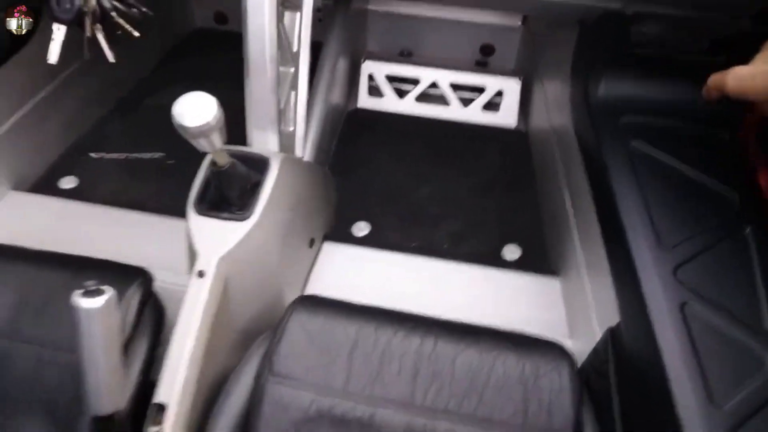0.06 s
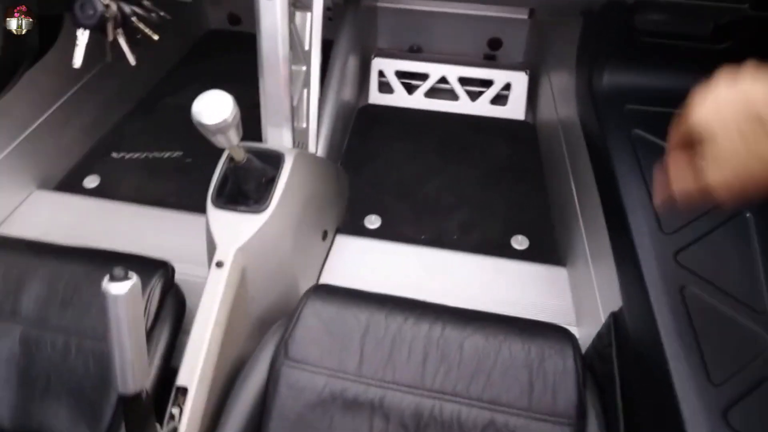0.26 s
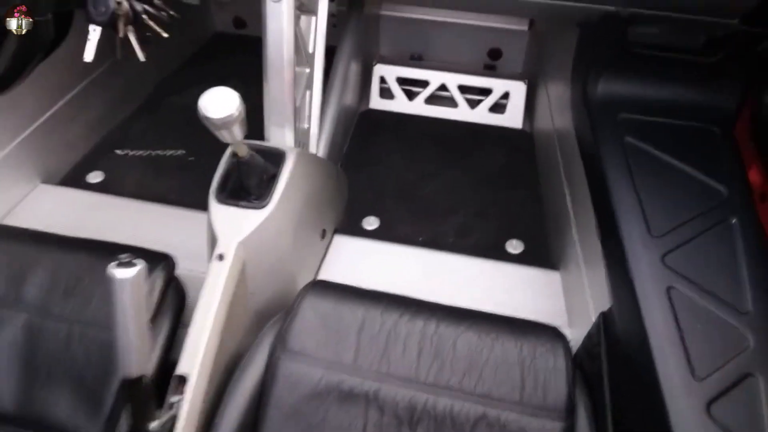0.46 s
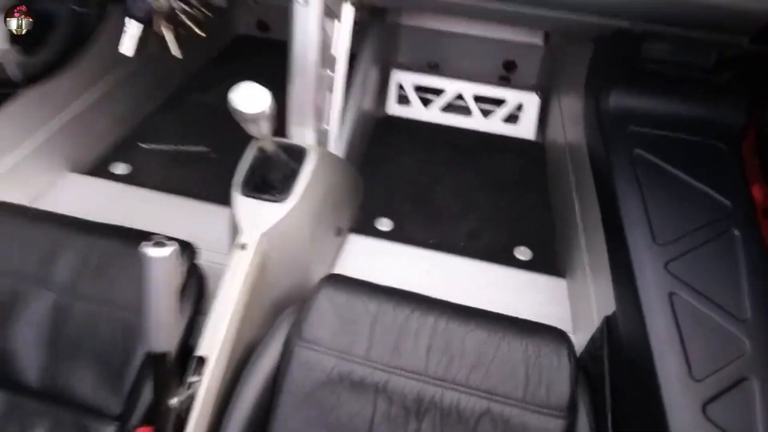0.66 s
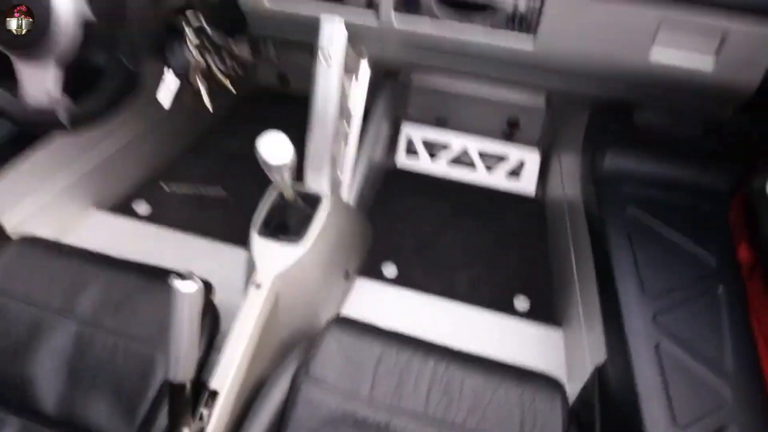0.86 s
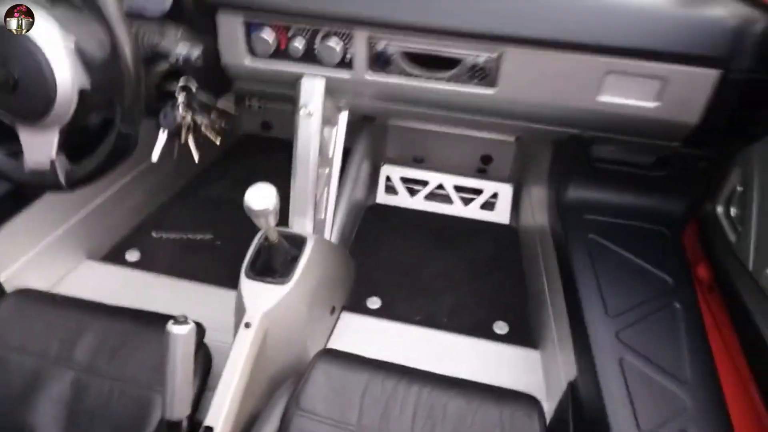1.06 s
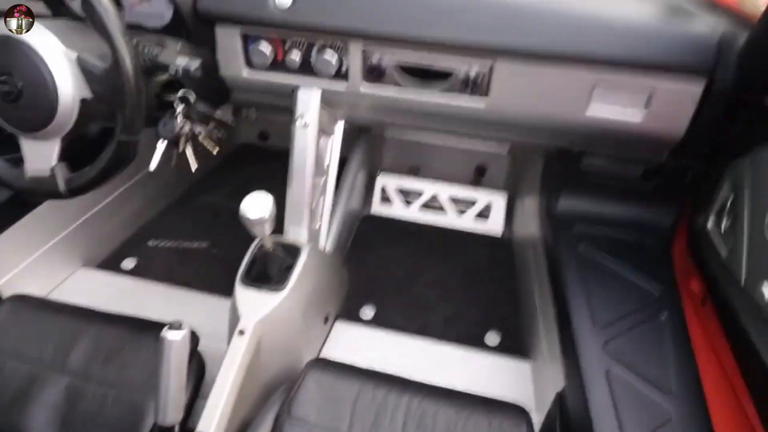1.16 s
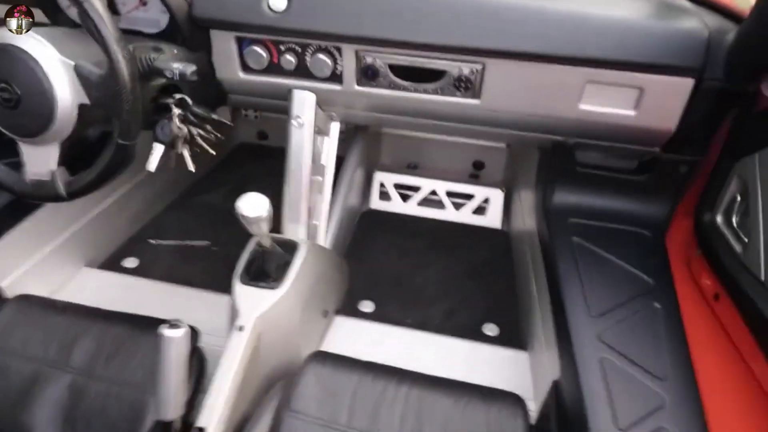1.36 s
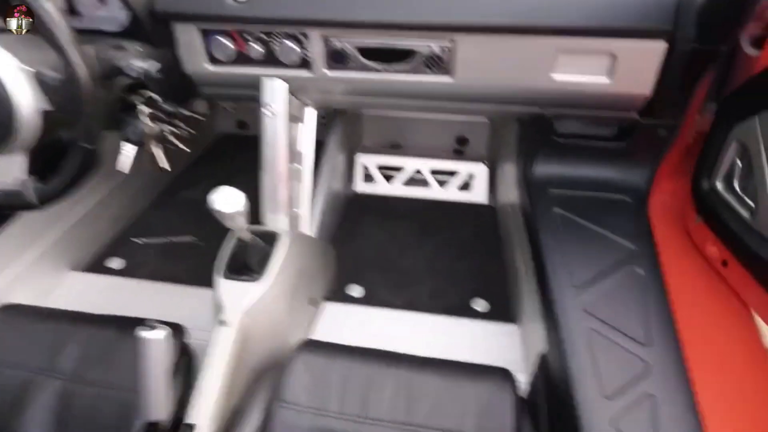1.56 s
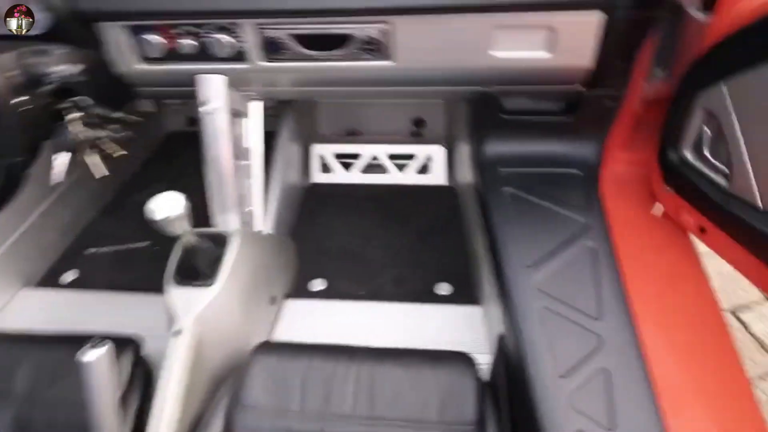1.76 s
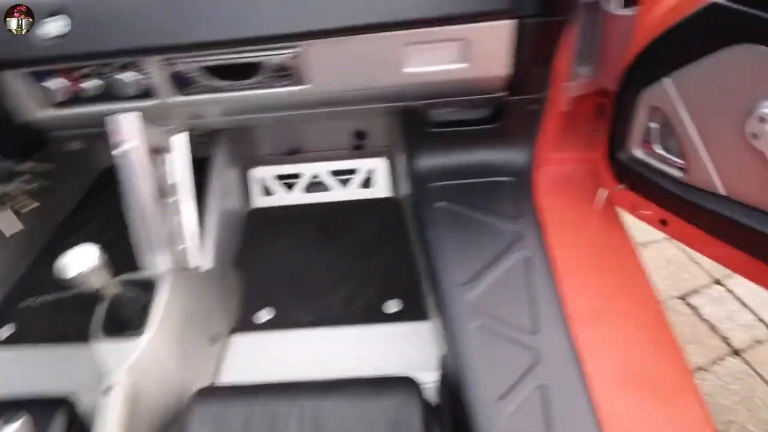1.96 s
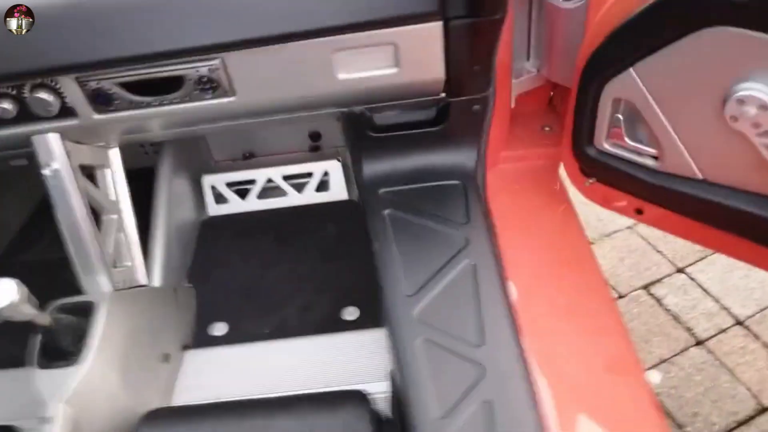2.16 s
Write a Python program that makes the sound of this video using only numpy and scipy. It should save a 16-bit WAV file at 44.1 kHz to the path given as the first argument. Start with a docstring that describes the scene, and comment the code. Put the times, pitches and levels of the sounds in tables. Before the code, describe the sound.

A car door mechanism clicks and clunks loudly, then creaks in a dry stuttering rasp, ending in dull bumps.

```python
"""Car door mechanism with a stick-slip creak

Inside a small car, a hand works the door mechanism: it clicks, lets go with a loud clunk and knocks again
as the door moves. Knocks are noise bursts and impulses that ring modes of panel, cabin air and steel.
A dry part creaks in stick-slip, stutters and stops: trains of impulses drive short noise and damped modes.
Sliding hisses, before and after the creak, are swells of noise with a gliding resonance; dull bumps follow.
Behind them lie a low rumble and a faint outdoor hiss of filtered noise."""
import sys
import numpy as np
from scipy import signal
from scipy.fft import rfft, irfft
from scipy.io import wavfile
from scipy.ndimage import uniform_filter1d

SR = 44100
rng = np.random.default_rng(int(sys.argv[2]) if len(sys.argv) > 2 else 0)


def int16_out(signal):
    """Quantize to a 16-bit WAV file."""
    q = np.round(np.clip(np.atleast_2d(signal).T, -1, 1) * 32767)
    wavfile.write(sys.argv[1], SR, q.astype(np.int16))


N = 97020

# Background spectrum: frequency_hz, relative_density_db
AIR_SPECTRUM = [(25, -2), (55, 1), (170, -10), (300, -16.5), (1000, -19), (3200, -19), (5500, -26.5),
                (8000, -32), (10200, -31.5), (16000, -42)]
# Outdoor hiss over time: time_s, level_db
HISS_LEVEL = [(0, -67), (.15, -60.5), (.4, -55.5), (.6, -52.5), (0.68, -54.5), (1.02, -55), (1.5, -56),
              (1.78, -56.5), (2.2, -80)]
RUMBLE_DB, AIR_SPLIT_HZ, HISS_FLICKER_DB = -46, 525, 1

# Sliding strokes, with Gaussian rise and fall widths: peak_s, rise_s, fall_s, level_db,
# resonance_hz, glide_octaves_per_s, resonance_re_hiss_db, resonance_half_width_hz
SLIDE_STROKES = [(0.762, 0.013, 0.01, -40.5, 2550, -0.16, 4.5, 446),
                 (.91, 0.03, 0.035, -50, 4740, .3, 1.5, 810),
                 (0.916, 0.04, 0.031, -64, 13600, -.1, 10, 2640),
                 (1.874, 0.027, 0.028, -53.5, 4860, -1.6, -2, 170),
                 (1.935, 0.065, 0.14, -55, 4220, -0.85, 4.5, 161),
                 (2.1, 0.084, 0.15, -54.5, 6310, -0.54, -4.5, 670),
                 (2.136, 0.018, 0.017, -47, 1876, 0.096, 5, 292)]
# Spectrum of the sliding hiss: frequency_hz, relative_density_db
SLIDE_SPECTRUM = [(300, -45), (1000, 0), (2500, 0), (4500, -6), (6800, -16), (8200, -19.5), (10500, -19.5),
                  (16000, -35)]
SLIDE_GRAIN_DB, SLIDE_PAN_DB = 0.8, 2.5  # pan: left minus right
SLIDE_WOBBLE = 0.006  # rms share of the resonance frequency

# Runs of stick-slip, a rasp that breaks into stutters: start_s, length_s, slip_rate_hz, level_db
SLIP_RUNS = [(1.049, .021, 120, -4), (1.0727, .009, 204, 0), (1.0852, .013, 209, 1.5),
             (1.1046, .038, 127, 1.5), (1.1456, .081, 193, -1), (1.2299, .036, 146, -1),
             (1.2743, .029, 115, 2), (1.3082, .028, 203, 1.5), (1.3432, .039, 121.5, 0.5),
             (1.393, .021, 66, 3), (1.417, .032, 139.6, 2.5), (1.4513, .015, 220, -9),
             (1.5091, .011, 128, 2.5), (1.5627, .019, 76, 4), (1.588, .022, 104, -3.5),
             (1.6174, .004, 101, -0.5), (1.627, .028, 151, 1)]
# Spectrum of one slip: frequency_hz, relative_density_db
SLIP_SPECTRUM = [(400, -9.5), (680, -9), (760, 3), (930, -1), (1150, -3.5), (1900, -3), (2600, -8.5),
                 (5200, -12.5), (6500, -18), (8000, -29), (10300, -28.5), (15000, -36)]
# Resonances of the creaking part: frequency_hz, relative_level_db, t60_s
CREAK_MODES = [(131.8, 3.5, 0.35), (178.6, -6, 0.49), (246.3, 2.5, 0.16), (309, 3.5, 0.098),
               (372, -0.5, 0.16), (442, 0, 0.21), (594.6, 0, 0.18), (747, 4.5, 0.085), (936, 8, 0.041)]
# Drive of those low resonances over time: time_s, relative_level_db
CREAK_BODY_LEVEL = [(1.05, -1), (1.2, -2), (1.35, -1.5), (1.4, -9), (1.66, -3.5)]
RASP_DB, GRUMBLE_DB, CREAK_RING_DB, CREAK_STEEL_DB = -47.5, -53.5, -43, -53
RASP_PAN_DB = 1  # left minus right
SLIP_DECAY_S, SCATTER_DECAY_S, SCATTER_DB = 0.0016, 0.009, -12  # time constants; scatter re snap
SLIP_JITTER_S, SLIP_STRENGTH_SPREAD_DB = 0.0003, 1.2  # standard deviations
SLIP_FRESH = 0.3  # power share of a slip's noise that never repeats
CONTACT_HOLD_S, CONTACT_PATCHES = 0.08, 14  # spacing of the contact patches and their number
CREAK_DRIFT = 0.025  # rms rate of delay change before the slow part is removed (samples per sample)

# Knocks of the mechanism: start_s, boom_db, panel_db, clack_db, tick_db, clack_and_tick_time_constant_s
KNOCKS = [(0.064, -36, -30.5, -36, -33.5, 0.023), (.097, -24.5, -31.5, -32, -78, 0.019),
          (0.111, -34, -31.5, -59, -72, 0.0065), (0.16, -38, -37.5, -46.5, -85, 0.09),
          (0.2076, -52, -15.5, -11.5, -24.5, 0.0073), (0.2158, -17, -12, -9.5, -21, 0.011),
          (0.2227, -32, -17, -17.5, -31, 0.011), (0.2332, -16, -24.5, -21.5, -34, 0.018),
          (0.319, -30, -41, -63, -72, 0.028), (0.437, -39, -53, -42.5, -74, 0.017),
          (0.602, -52, -59, -43, -44.5, 0.009), (.724, -33.5, -72, -55, -51, 0.032),
          (0.7431, -32.5, -38, -24, -26, 0.0044), (0.7575, -34, -42, -24.5, -50, 0.0065),
          (0.775, -31.5, -73, -44, -79, 0.074), (0.807, -56, -36, -48, -79, 0.019),
          (0.846, -36, -49, -40, -66, 0.018), (0.977, -60, -54, -81, -53.5, 0.018),
          (1.469, -38, -66.5, -71.5, -73, 0.014), (1.676, -33.5, -59, -59, -79, 0.029),
          (1.761, -46, -47, -68, -50.5, 0.0045), (1.811, -38, -61, -45, -61, 0.018),
          (1.8346, -36.5, -37.5, -43, -59, 0.14), (1.896, -24, -27.5, -36, -76, 0.01),
          (1.921, -25.5, -35.5, -44.5, -75, 0.021), (1.973, -31, -57, -52.5, -80, 0.074),
          (2.093, -35, -38.5, -47.5, -69, 0.027), (2.124, -32.5, -39.5, -41.5, -65, 0.016),
          (2.144, -33.5, -46, -44, -54.5, 0.039)]
# Modes of the door panel: frequency_hz, relative_level_db, t60_s
PANEL_MODES = [(169.4, 8.5, 0.13), (221.8, 2, 0.41), (263, 5, 0.15), (335.4, 9.5, 0.14), (382, 6.5, 0.17),
               (449.6, 7, 0.17), (519, 3.5, 0.23), (623, 10, 0.072)]
# Modes of the cabin air: frequency_hz, relative_level_db, t60_s
CABIN_MODES = [(56, -17, .45), (108, -9, .2), (128, 0, .15), (146, -5, .14), (170, -4, .16)]
# Modes of the steel parts: frequency_hz, relative_level_db, t60_s
STEEL_MODES = [(1013, 18, 0.19), (1160, 8, 0.4), (1616, 12, 0.16), (1730, 10, 0.1), (2090, -8, .13),
               (3135, -14.5, 0.15), (3630, 5, 0.13), (4351, -37, 0.045), (5500, -45, 0.076)]
# Spectrum of the broad contact noise: frequency_hz, relative_density_db
CLACK_SPECTRUM = [(100, -14), (300, 0), (600, -2), (1200, -3), (1700, -6), (2500, -11), (4500, -15),
                  (7000, -27), (16000, -60)]
# Spectrum of the bright contact noise: frequency_hz, relative_density_db
TICK_SPECTRUM = [(500, -25), (2000, -8), (3800, 0), (5500, 0), (6800, -4), (7900, -15), (10200, -12),
                 (11500, -22), (13500, -23), (16000, -32)]
# Spectrum of the dull part of a knock: frequency_hz, relative_density_db
THUD_SPECTRUM = [(30, -16), (60, -42.5), (110, 8), (170, 0), (300, -3), (600, -21), (2000, -53.5)]
KNOCK_ATTACK_S, RATTLE_DB = 0.0018, 1
THUD_DB, THUD_PEAK_S = -7.52, 0.0095  # peak gain re boom; time to the peak
STEEL_DB = -16.5  # steel ring re clack

# Balance of the two ports: frequency_hz, left_minus_right_db
MIC_BALANCE = [(60, 1), (300, 0), (1000, 2), (2400, 1.5), (4500, 4.5), (7200, 8), (10000, -13), (15000, 2)]
MODE_PHASE_SPREAD = 0.05  # radians at 100 Hz, opposite on the two sides
DIFFUSE_HZ, RIGHT_LAG_S = 940, 0.000421
TREBLE_TOP_HZ, RECORDER_TOP_HZ = 12000, 15700

LEFT_RIGHT = np.array([[1], [-1]])


def undb(db):
    """Amplitude gain is the base-ten exponential of the level over 20."""
    return 10 ** (np.asarray(db) / 20)


def unit(x):
    """Normalisation to unit rms fixes the mean power."""
    return x / np.sqrt(np.mean(x ** 2))


def clock():
    """Uniform sampling places each sample at its index over the rate, in seconds."""
    return np.arange(N) / SR


def gain_at(points):
    """A (Hz, dB) curve is interpolated over log frequency on the bins of a double-length transform."""
    hz, db = np.array(points, float).T
    bin_hz = np.arange(N + 1) * SR / (2 * N)
    return undb(np.interp(np.log(bin_hz + 1), np.log(hz), db))


def colour(x, points):
    """Minimum phase: folding the cepstrum gives a causal filter of the wanted magnitude."""
    cepstrum = irfft(np.log(gain_at(points)))
    cepstrum[1:N] *= 2
    cepstrum[N + 1:] = 0
    response = np.exp(rfft(cepstrum))
    return irfft(rfft(x, 2 * N) * response)[..., :N]


def band(x, hz, kind):
    """A second-order Butterworth low-pass or high-pass has a gentle slope."""
    return signal.sosfilt(signal.butter(2, hz, kind, fs=SR, output="sos"), x)


def noise_pair():
    """Diffuse-field coherence: white noise is shared in the bass and less related in the treble."""
    mid, side = rfft(rng.standard_normal((2, N)))
    hz = np.arange(len(mid)) * SR / N
    apart = hz / (hz + DIFFUSE_HZ)
    return irfft((mid + apart * side * LEFT_RIGHT) / np.sqrt(1 + apart ** 2), N)


def through(x, response):
    """Linear response: the output is the drive convolved with an impulse response."""
    return signal.fftconvolve(np.atleast_2d(x), np.atleast_2d(response), axes=-1)[:, :N]


def ring(modes):
    """Modal superposition: damped sines of alternating sign, so the ring builds up."""
    t, total = clock()[:N // 2], 0
    for k, (hz, db, t60) in enumerate(modes):
        phase = MODE_PHASE_SPREAD * np.sqrt(hz / 100) * rng.standard_normal() * LEFT_RIGHT
        decay = np.exp(-np.log(1000) * t / t60)
        total = total + (-1) ** k * undb(db) * np.sin(2 * np.pi * hz * t + phase) * decay
    return total / np.sqrt(sum(undb(db) ** 2 for _, db, _ in modes) / 2)


def pulses(times, sizes):
    """An impulsive force is represented by one weighted sample at its time."""
    return np.bincount(np.clip(np.array(times) * SR, 0, N - 1).astype(int), sizes, N)


def walk(rate):
    """Smoothed random steps, at the given rate in Hz, fluctuate slowly with unit rms."""
    step = int(SR / rate)
    held = np.repeat(rng.standard_normal(N // step + 1), step)
    return unit(uniform_filter1d(held, step)[:N])


def background():
    """Filtered broadband noise: a steady low rumble and an outdoor hiss that swells and flickers."""
    rumble = band(colour(noise_pair(), AIR_SPECTRUM), AIR_SPLIT_HZ, "low")
    hiss = band(colour(noise_pair(), AIR_SPECTRUM), AIR_SPLIT_HZ, "high")
    hiss_db = np.interp(clock(), *np.array(HISS_LEVEL).T) + HISS_FLICKER_DB * walk(25)
    return undb(RUMBLE_DB) * unit(rumble) + undb(hiss_db) * unit(hiss)


def slides():
    """Sliding friction: surfaces give a grainy hiss with one gliding, unsteady resonance."""
    t, strokes = clock(), 0
    for peak, rise, fall, db, hz, glide, resonance_db, width in SLIDE_STROKES:
        age = t - peak
        swell = np.exp(-(age / np.where(age < 0, rise, fall)) ** 2 / 2)
        gliding_hz = hz * 2 ** (glide * np.clip(age, -0.5, 0.5))  # glides within 0.5 s of the peak
        phase = 2 * np.pi * np.cumsum(gliding_hz * (1 + SLIDE_WOBBLE * walk(60))) / SR
        # low-passed noise on a carrier is a narrow band around it
        resonance = unit(band(rng.standard_normal((2, N)), width, "low") * np.sin(phase))
        hiss = unit(colour(noise_pair(), SLIDE_SPECTRUM))
        strokes = strokes + undb(db) * swell * (hiss + undb(resonance_db) * resonance)
    return strokes * undb(SLIDE_GRAIN_DB * walk(230) + LEFT_RIGHT * SLIDE_PAN_DB / 2)


def slip_train():
    """Relaxation oscillation: stick-slip impulses, each a little off in time and strength."""
    slips = []
    for start, length, rate, db in SLIP_RUNS:
        for lag in np.arange(0, length, 1 / rate):
            slips.append((start + lag, db))
    times, levels = np.array(slips).T
    time_error, strength = rng.standard_normal((2, len(times)))
    return pulses(times + SLIP_JITTER_S * time_error, undb(levels + SLIP_STRENGTH_SPREAD_DB * strength))


def slip_noise(drive):
    """Rough contact: slips snap and scatter, partly afresh and partly repeating within a contact patch."""
    t = clock()[:N // 32]
    spread = np.exp(-t / SLIP_DECAY_S) + undb(SCATTER_DB) * np.exp(-t / SCATTER_DECAY_S)
    fresh = noise_pair() * np.sqrt(np.abs(through(drive ** 2, spread ** 2)))
    patches, held = noise_pair(), 0
    place = (clock() - SLIP_RUNS[0][0]) / CONTACT_HOLD_S
    for k in range(CONTACT_PATCHES):
        touch = np.sqrt(np.maximum(1 - np.abs(place - k), 0))  # neighbouring patches crossfade
        patch = patches[:, k * len(t):(k + 1) * len(t)]
        held = held + through(drive * touch, patch * spread)
    return np.sqrt(SLIP_FRESH) * unit(fresh) + np.sqrt(1 - SLIP_FRESH) * unit(held)


def creak():
    """Stick-slip excitation: slips ring the part and steel; moving contact shifts colour and bends the lows."""
    drive = slip_train()
    snap = slip_noise(drive)
    rasp = unit(band(colour(snap, SLIP_SPECTRUM), 590, "high"))
    rasp = rasp * undb(RASP_DB + LEFT_RIGHT * RASP_PAN_DB / 2)
    grumble = unit(band(band(snap, 386, "low"), 125, "high")) * undb(GRUMBLE_DB)
    body_gain = undb(np.interp(clock(), *np.array(CREAK_BODY_LEVEL).T))
    body = through(drive * body_gain, ring(CREAK_MODES))
    # a varying read position, in samples, bends the pitch
    bend = band(np.cumsum(CREAK_DRIFT * walk(14)), 2, "high")
    body = np.array([np.interp(np.arange(N) + bend, np.arange(N), side) for side in body])
    steel = through(drive, ring(STEEL_MODES))
    return rasp + grumble + undb(CREAK_RING_DB) * unit(body) + undb(CREAK_STEEL_DB) * unit(steel)


def knocks():
    """Impact excitation: a knock thuds, rings cabin, panel and steel, and leaves a rattling clack and tick."""
    when, boom_db, panel_db, clack_db, tick_db, decay = np.array(KNOCKS).T
    age = np.maximum(clock() - when[:, None], 0)
    shape = (1 - np.exp(-age / KNOCK_ATTACK_S)) * np.exp(-age / decay[:, None])
    clack = undb(clack_db) @ shape * unit(colour(noise_pair(), CLACK_SPECTRUM))
    tick = undb(tick_db) @ shape * unit(colour(noise_pair(), TICK_SPECTRUM))
    boom = through(pulses(when, undb(boom_db)), ring(CABIN_MODES))
    panel = through(pulses(when, undb(panel_db)), ring(PANEL_MODES))
    steel = through(pulses(when, undb(clack_db + STEEL_DB)), ring(STEEL_MODES))
    thud_shape = np.e * age / THUD_PEAK_S * np.exp(-age / THUD_PEAK_S)  # peaks at 1
    thud = undb(boom_db + THUD_DB) @ thud_shape * unit(colour(noise_pair(), THUD_SPECTRUM))
    return thud + boom + panel + steel + (clack + tick) * undb(RATTLE_DB * walk(400))


def scene():
    """Interaural-like differences: all sources meet two ports, the right one reached slightly later."""
    left, right = rfft(background() + slides() + creak() + knocks(), 2 * N)
    lean = np.sqrt(gain_at(MIC_BALANCE))  # half the balance on each side
    lag = np.exp(-1j * np.pi * np.arange(N + 1) * SR / N * RIGHT_LAG_S)
    return irfft(np.array([left * lean, right * lag / lean]))[:, :N]


def record(dry):
    """Band limiting: the highest treble is gently dulled and the recorder cuts the top."""
    dulled = band(dry, TREBLE_TOP_HZ, "low")
    return signal.sosfilt(signal.ellip(8, 0.2, 70, RECORDER_TOP_HZ, fs=SR, output="sos"), dulled)


dry = scene()
out = record(dry)
int16_out(out)
```